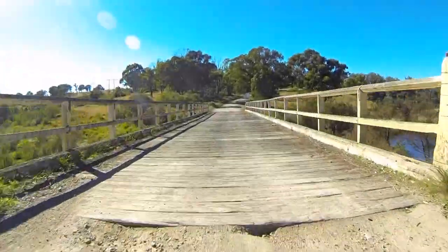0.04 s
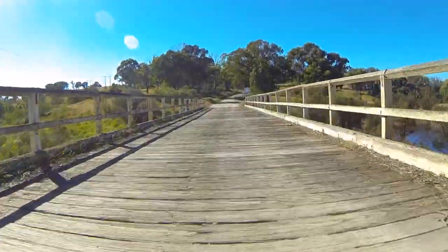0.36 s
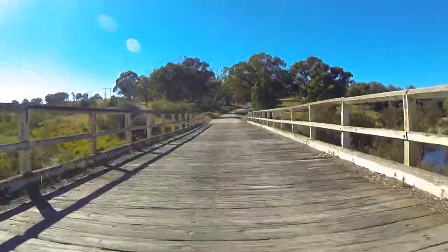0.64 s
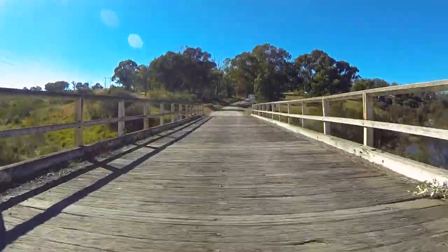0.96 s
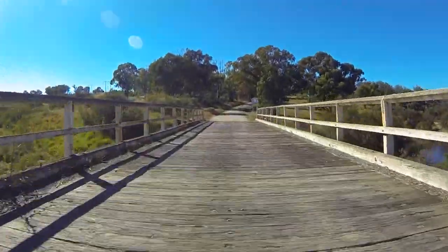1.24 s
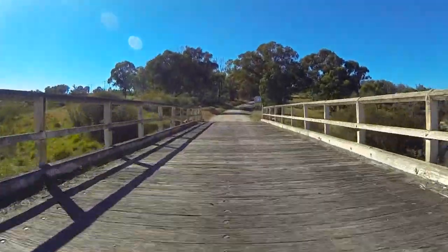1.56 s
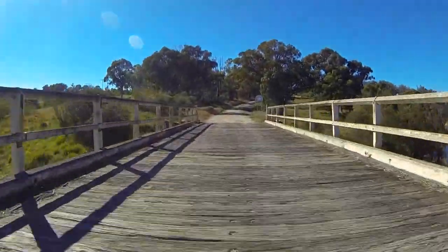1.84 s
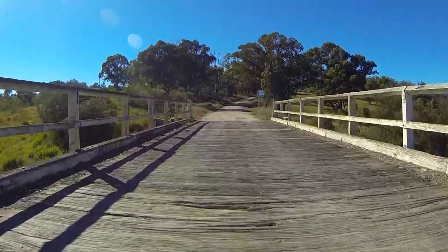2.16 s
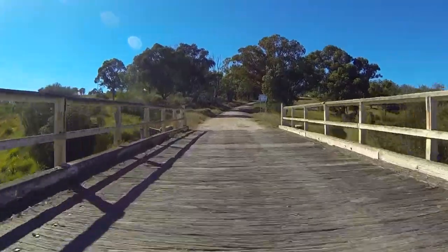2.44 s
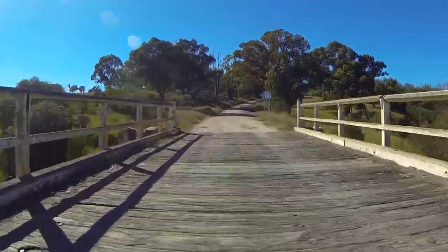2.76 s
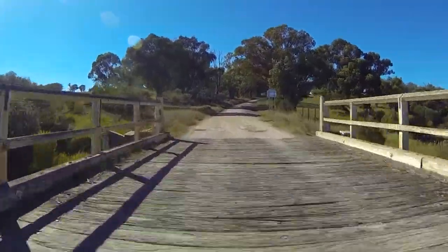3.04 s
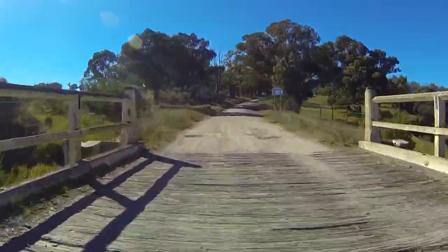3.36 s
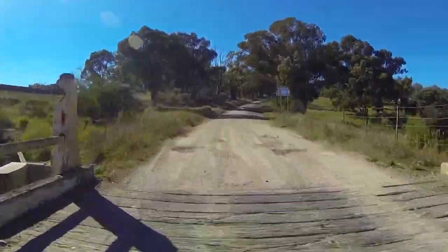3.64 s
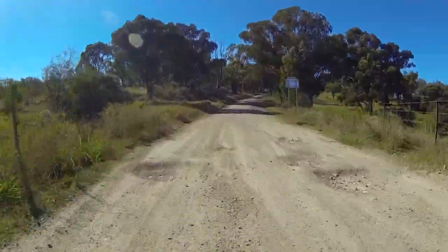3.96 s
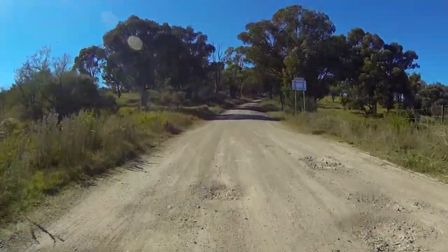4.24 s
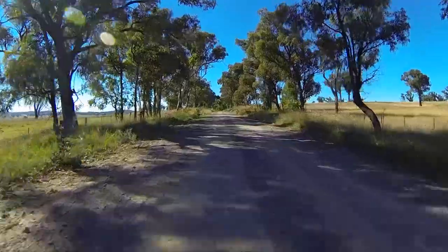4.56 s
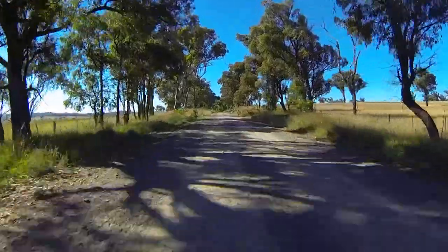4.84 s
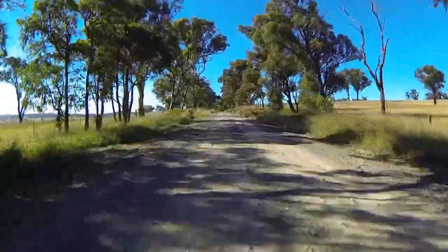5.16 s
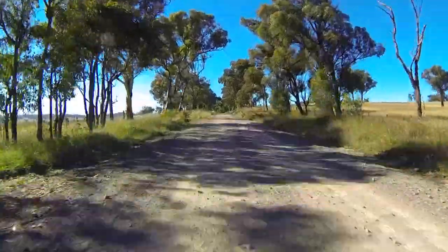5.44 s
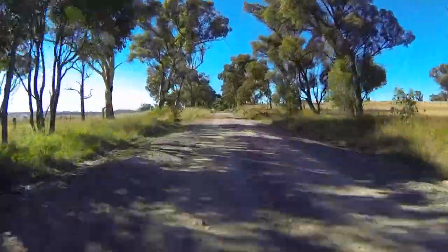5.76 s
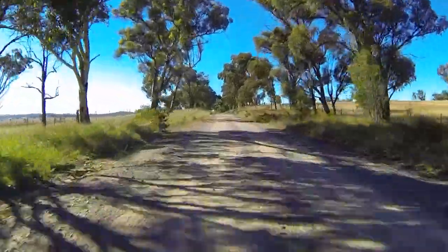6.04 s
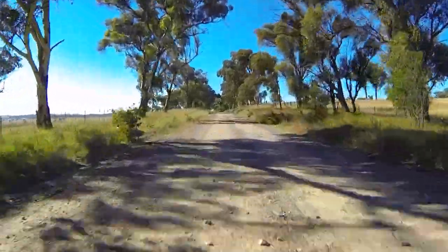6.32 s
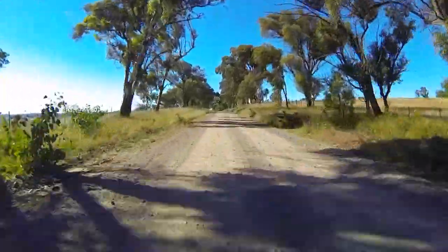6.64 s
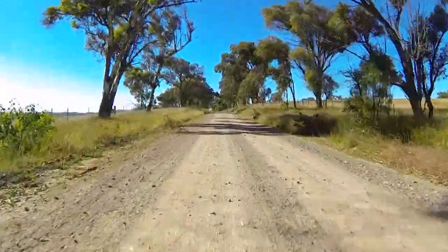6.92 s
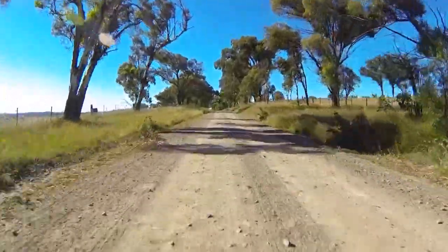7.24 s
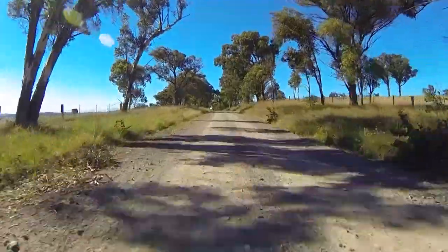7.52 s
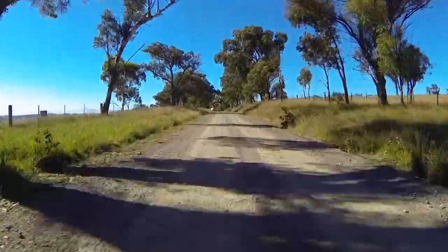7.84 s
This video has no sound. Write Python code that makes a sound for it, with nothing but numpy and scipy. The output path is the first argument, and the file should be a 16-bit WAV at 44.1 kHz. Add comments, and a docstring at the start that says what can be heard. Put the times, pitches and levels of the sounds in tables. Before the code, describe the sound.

Tyres thump across loose wooden boards as a car rattles, giving way to gravel roar, a steady engine and wind on the microphone.

```python
"""Car on a timber bridge, then gravel

Heard from the bonnet, a six-cylinder car coasts over a timber bridge: the tyres drum and knock on the planks,
and the body rattles and squeaks. At 4.5 s the scene changes to the car pulling gently along a gravel road: the
engine drones, the tyres roar, stones tick under the body and wind buffets the microphone. The sound is dull and
nearly mono, and the camera case around the microphone rings in the treble."""
import sys
import numpy as np
from scipy import signal
from scipy.io import wavfile

SR = 44100
rng = np.random.default_rng(int(sys.argv[2]) if len(sys.argv) > 2 else 0)


def digitize_waveform(pressure):
    """Quantize a signal to 16-bit integers and store it at the path in sys.argv[1].

    Rows of a 2-D input are taken as channels; values are limited to [-1, 1].
    """
    field = np.atleast_2d(pressure).T
    bounded = np.clip(field, -1, 1)
    quanta = np.round(bounded * 32767).astype(np.int16)
    wavfile.write(sys.argv[1], SR, quanta)


N = 356636
TIME = np.arange(N) / SR
GRAVEL_FROM_S = 4.48

# Levels in the tables are relative: the functions add their own gains.
# A ring_s is the time a sound takes to fade by 60 dB.

# Tone colours, or how strong each noise is from low to high: pitch_hz, level_db
HISS_COLOUR = [(3000, 1), (8000, -8), (12000, -4), (15500, -1)]
GRAVEL_COLOUR = [(20, -27), (32, -8.5), (45, -4), (75, -6), (100, -8.5), (150, -6), (240, -12.5),
                 (320, -21.5), (620, -26.8), (1000, -33.8), (1400, -38), (2000, -45.5), (4600, -58.8),
                 (8000, -80.5), (15000, -76)]
TICK_COLOUR = [(600, -12), (1500, 13), (3000, -1), (6000, -0.5), (8000, -30), (11500, -2), (15500, -37.5)]
BRIDGE_COLOUR = [(12, -42), (20, -8), (53, -1.5), (129, -3.5), (245, -5.5), (315, -15.3), (519, -21),
                 (614, -23.5), (1040, -24.5), (1200, -28.5), (2840, -40.5), (4400, -44), (6020, -49.5),
                 (8640, -76), (11100, -39), (15500, -77.5)]
CLATTER_COLOUR = [(300, 1), (600, -4), (1000, -10), (2000, -9.5), (2900, -17), (5500, -23), (8000, -49.5),
                  (11500, -38), (15500, -58)]

# Loudness along the gravel road: time_s, wind_db, drum_db, roar_db
GRAVEL_LEVELS = [(4.5, -33, -33, -46.5), (4.75, -35, -31, -43.5), (5.0, -33, -33, -44.5),
                 (5.33, -33.5, -36, -47.5), (5.93, -36, -38, -49), (6.7, -33.5, -36, -48),
                 (7.13, -34.5, -35.5, -47.7), (7.8, -31.5, -32.5, -45.7)]
# Engine speed, counted in full four-stroke cycles: time_s, speed_hz
ENGINE_SPEED = [(4.45, 17.53), (4.75, 17.64), (5, 17.92), (5.6, 18.3), (6, 18.6), (6.6, 18.87), (7, 19.03),
                (7.2, 19.06), (8.09, 19.41)]
# How hard the engine pulls: time_s, drone_db, howl_db
ENGINE_LOAD = [(4.45, -1.5, -2), (5.1, 1, 2.5), (6.3, 0, 0.5), (7.3, 0, 2), (8.09, 0, 2)]
# Tones of the engine's drone and its air intake's howl. Each is a multiple of the engine speed and
# swells where it meets a resonance: multiple, level_db, swell_speed_hz, swell_width_hz, swell_db
DRONE_TONES = [(6, -36, 18.5, .5, 2), (7, -52, 19.25, .35, 13), (8, -38, 18.6, 1.1, 5),
               (9, -42, 18.45, .85, 13), (10, -55, 18.75, .18, 13), (12, -48, 18, .5, 7),
               (14, -49, 19.1, .4, 3), (18, -50, 19.3, .35, 7), (20, -58, 19.3, .4, 11),
               (21, -60, 18.9, .7, 9), (22, -54, 18.35, .55, 10.5), (24, -58, 18.6, .6, 9),
               (28, -64, 18.95, .35, 11), (38, -66, 18.3, .3, 10), (42, -68, 18.95, .35, 10)]
HOWL_TONES = [(64, -72, 19.2, .55, 14), (66, -75, 18.75, .55, 21.5), (70, -75, 18.3, .4, 13),
              (72, -75, 18.85, .42, 18)]
# Resonances of the air intake: pitch_hz, half_width_hz, level_db
INTAKE_RESONANCES = [(1230, 50, -0.5), (1358, 32, -2.5)]

# Trim squeaking as the body flexes: start_s, level_db, pitch_hz, length_s
SQUEAK_EVENTS = [(2.611, -47.5, 4030, 0.018), (2.674, -47, 3910, 0.018), (2.913, -46.5, 3930, 0.023),
                 (2.975, -44, 3950, 0.028), (3.128, -53, 3950, .015), (3.36, -48, 4090, 0.014),
                 (3.389, -54, 4650, 0.032), (3.663, -52, 4090, 0.014), (4.338, -56, 4620, .025),
                 (5.151, -49, 3760, 0.015), (5.292, -46, 3830, 0.013), (5.43, -55, 3760, .014),
                 (6.588, -57, 4530, .02), (6.815, -57, 4580, .022), (7.571, -52, 4620, 0.012)]
# Stones and loose fittings ticking: start_s, level_db
TICK_EVENTS = [(0.592, -43), (0.751, -49), (2.106, -42), (2.498, -50), (2.9442, -52), (3.0075, -48),
               (3.307, -52), (3.4444, -48), (3.511, -53), (4.3125, -48.5), (4.466, -50.5), (4.7154, -44),
               (4.915, -49), (5.0005, -44), (5.547, -48), (5.604, -50), (5.643, -47), (6.2981, -50),
               (7.11, -53), (7.7894, -51)]
# Bouts of buzzing from a small loose metal part: loudest_s, level_db, build_up_s
BUZZ_EVENTS = [(0.58, -67, 0.097), (1.207, -57, 0.013), (1.32, -55.5, 0.097), (1.37, -54, .018),
               (1.59, -57, .06), (1.67, -62, .02), (1.895, -64, .008)]
# The notes that metal part rings at: pitch_hz, level_db
METAL_NOTES = [(9450, -1), (10820, 0), (11100, 4), (12020, 3), (12520, -8), (13050, -6), (14950, -5)]

# How hard the bridge shakes the car: time_s, drum_db, roar_db
BRIDGE_LEVELS = [(0.0, -34, -45), (0.27, -35, -49), (0.42, -31.5, -45.5), (0.7, -33.5, -43.5),
                 (0.87, -39.5, -46), (1.19, -36.5, -45.5), (1.3, -31, -36.5), (1.41, -32.5, -44),
                 (1.6, -37.5, -44), (1.82, -44, -50), (1.94, -33, -46), (2.13, -32.5, -45.5),
                 (2.24, -37, -48), (2.72, -41, -56.5), (3.05, -36.5, -47.5), (3.3, -42, -54),
                 (3.74, -37.5, -51), (4.3, -40, -55), (4.48, -33.5, -50)]
# The body's rumble compared with the drumming: time_s, offset_db
BODY_RUMBLE = [(0.2, -5), (0.7, -2), (1.3, .5), (3, 1), (4.4, 0)]
# Hollow notes of loose timbers: start_s, level_db, pitch_hz, ring_s
TIMBER_EVENTS = [(0.564, -31, 610, .08), (0.682, -29, 640, 0.077), (0.863, -32, 570, .09),
                 (0.884, -22.5, 537, .11), (1.083, -25.5, 550, .07), (1.108, -27.5, 420, .07),
                 (2.04, -27.5, 485, 0.17)]
# A loose plank slapping the beam under it: start_s, level_db
SLAP_EVENTS = [(1.362, -26), (1.4667, -25)]
# The notes that plank rings at: pitch_hz, level_db, ring_s
PLANK_NOTES = [(644, -5.5, .08), (914, 4, 0.049), (1260, -4, .06), (1464, -2.5, 0.041), (2094, -12, 0.058),
               (2902, -13, .06)]
# Blows from planks, ruts and stones: start_s, knock_db, thump_db, clatter_db, pitch_hz
KNOCK_EVENTS = [(0.073, -31, -36, -54, 650), (0.143, -32, -38, -56, 1000), (0.217, -31, -32, -57, 550),
                (0.272, -27.5, -37, -51, 900), (0.372, -30, -22, -58, 400), (0.453, -25, -28, -43, 700),
                (0.524, -31, -20.5, -49, 500), (0.565, -22.5, -31, -41, 800), (0.606, -25, -21, -47, 700),
                (0.683, -24, -25, -49, 620), (0.73, -29, -36, -50, 700), (0.815, -31, -42, -47, 900),
                (1.083, -26, -38, -47, 560), (1.206, -19, -26, -36, 850), (1.232, -24, -32, -31.5, 2900),
                (1.284, -21, -25, -36, 1400), (1.31, -21, -25, -35, 1000), (1.362, -17, -25, -34, 1000),
                (1.428, -24, -34, -42.5, 1000), (1.467, -17, -40, -40, 1400), (1.585, -30, -27, -47, 1000),
                (1.663, -30, -36, -41, 900), (1.894, -33, -31, -48, 700), (1.975, -24.5, -29, -44, 700),
                (2.040, -20.5, -22, -39, 700), (2.105, -26, -32, -42, 1300), (2.158, -28, -27, -46, 1300),
                (2.293, -26, -31, -49, 690), (2.403, -25.5, -37, -46, 900), (2.424, -30, -40, -48, 1400),
                (2.807, -27.5, -35, -47, 1100), (2.835, -31, -34, -50, 1200), (2.976, -29, -35, -54, 1000),
                (3.11, -30, -38, -56, 1100), (3.425, -28, -31, -49, 900), (3.56, -34, -38, -50, 1500),
                (3.661, -27.5, -37, -56, 700), (3.72, -32, -30, -54, 800), (3.812, -32, -32, -52, 1000),
                (4.140, -28.5, -36, -47, 890), (4.40, -36, -28, -56, 600), (4.51, -33, -24, -55, 500),
                (4.533, -25, -36, -49, 700), (4.583, -26, -37, -47, 1600), (4.661, -26, -32, -48, 900),
                (4.685, -23, -26, -46, 1100), (4.784, -22, -26, -45, 1000), (5.05, -27, -30, -48, 1900),
                (7.664, -26, -32, -53, 1500), (7.745, -27, -26, -52, 1200)]
# The low notes of the suspension and bonnet: pitch_hz, level_db, ring_s
BODY_NOTES = [(59.7, -3, 0.4), (76.6, 4, 0.05), (122.6, 2, 0.16), (145.7, -1.5, 0.22), (187, -.5, 0.07),
              (255, -1.5, 0.17)]

# A slight lean to the left, added to that side and taken from the right: time_s, lean_db
LEFT_LEAN = [(4.5, 0), (5.2, 0.3), (6.7, 0.25), (7.2, 0)]
# Resonances of the camera case: pitch_hz, width_hz, boost_db
CASE_RESONANCES = [(2790, 160, 2.5), (3950, 300, 3), (5900, 500, 3), (7950, 400, 3), (9450, 450, 5),
                   (10900, 600, 4), (12500, 200, 3)]


def from_db(db):
    """Turn decibels into a number to multiply by."""
    return 10 ** (np.asarray(db) / 20)


def unit_level(sound):
    """Scale a sound so that its average level (rms) is 1."""
    return sound / np.sqrt(np.mean(sound ** 2) + 1e-20)


def curves(rows):
    """Join a table's points in time, giving one curve for each column after the first."""
    times, *columns = np.transpose(rows)
    return [np.interp(TIME, times, column) for column in columns]


def follow(db, offset_db, share):
    """A level curve set apart from another, copying a share of its ups and downs."""
    return db.mean() + offset_db + share * (db - db.mean())


def white_noise():
    """Noise with all pitches equally strong."""
    return rng.standard_normal(N)


def drift(rate_hz):
    """A smooth random wander, about 1 in size; a higher rate wanders faster."""
    step, warm_up = 40, 2000
    keep = np.exp(-2 * np.pi * step * rate_hz / SR)
    noise = rng.standard_normal(N // step + warm_up + 2)
    slow = signal.lfilter([1], [1, -2 * keep, keep * keep], noise)[warm_up:]
    return np.interp(np.arange(N) / step, np.arange(len(slow)), unit_level(slow))


def clicks_at(times, heights):
    """Silence with one click at each time."""
    clicks = np.zeros(N)
    samples = np.round(np.asarray(times) * SR).astype(int)
    np.add.at(clicks, np.clip(samples, 0, N - 1), heights)
    return clicks


def ring(clicks, hz, ring_s):
    """Each click starts a pure note that fades away."""
    keep = from_db(-60 / (ring_s * SR))
    turn = 2 * np.pi * hz / SR
    return signal.lfilter([0, np.sin(turn)], [1, -2 * keep * np.cos(turn), keep * keep], clicks + 1e-18)


def fade_after(clicks, ring_s):
    """A loudness curve that jumps at each click, then dies away."""
    keep = from_db(-120 / (ring_s * SR))
    return np.sqrt(signal.lfilter([1], [1, -keep], clicks ** 2 + 1e-18))


def jolts(per_s, spread_db, ring_s, share):
    """A bumpy loudness curve: small random hits give a share of the power, the rest is steady."""
    hits = rng.random(N) < per_s / SR
    heights = from_db(spread_db * np.clip(white_noise(), -2, 2))
    bumps = unit_level(fade_after(hits * heights, ring_s))
    return np.sqrt(1 - share + share * bumps ** 2)


def band(sound, low_hz, high_hz):
    """Keep the part of a sound between two pitches."""
    return signal.sosfilt(signal.butter(2, [low_hz, high_hz], "band", fs=SR, output="sos"), sound)


def resonate(sound, hz, width_hz, boost_db):
    """Make a sound louder around one pitch, or quieter if the boost is negative."""
    near_pitch = signal.lfilter(*signal.iirpeak(hz, hz / width_hz, fs=SR), sound)
    return sound + (from_db(boost_db) - 1) * near_pitch


def colour_gain(colour, hz):
    """How strong a tone colour is at a given pitch."""
    pitches, levels = np.transpose(colour)
    return from_db(np.interp(np.log(hz), np.log(pitches), levels))


def colour_level(colour, low_hz, high_hz):
    """The average level between two pitches of white noise given this colour."""
    return np.sqrt(np.sum(colour_gain(colour, np.arange(low_hz, high_hz)) ** 2) * 2 / SR)


def coloured(colour, noise_for):
    """Build a tone colour from half-octave bands; noise_for(hz) feeds each band."""
    edges = 22 * 2 ** np.arange(0, 9.6, .5)
    out = 0
    for low, high in zip(edges, edges[1:]):
        hz = np.sqrt(low * high)
        out = out + colour_gain(colour, hz) * band(noise_for(hz), low, high)
    return out


def microphone_hiss():
    """The microphone's own faint, steady hiss."""
    return from_db(-78) * unit_level(coloured(HISS_COLOUR, lambda hz: white_noise()))


def rolling(colour, zones, shake, grit, wander_db):
    """Tyre noise, shaken by jolts and gritty on top. Each zone is low_hz, high_hz, level_db."""
    centres = [np.log(np.sqrt(low * high)) for low, high, db in zones]
    gains = [from_db(db) / colour_level(colour, low, high) for low, high, db in zones]

    def noise_for(hz):
        weights = [np.interp(np.log(hz), centres, row) for row in np.eye(len(zones))]
        level = sum(gain * weight for gain, weight in zip(gains, weights))
        shaken = 1 + min(hz / 500, 1) * (shake - 1)
        gritty = 1 + min(hz / 4000, 1) * (grit - 1)
        return white_noise() * level * shaken * gritty * from_db(wander_db * drift(15.2))
    return coloured(colour, noise_for)


def wind_and_gravel():
    """Wind buffets the microphone while the tyres crunch over small stones."""
    wind_db, drum_db, roar_db = curves(GRAVEL_LEVELS)
    crunch_db = follow(roar_db, offset_db=-12.5, share=0.85)
    zones = [(30, 100, wind_db), (110, 280, drum_db), (550, 1100, roar_db), (1800, 7000, crunch_db)]
    ruts = jolts(per_s=260, spread_db=-1, ring_s=0.035, share=0.19)
    stones = jolts(per_s=850, spread_db=7, ring_s=0.0048, share=0.33)
    return from_db(-0.1) * rolling(GRAVEL_COLOUR, zones, ruts, stones, wander_db=1.62)


def engine(wobble=0.0006, flutter_db=1, uneven_db=.7, rush_db=-59, throb_at_s=6.011):
    """Six cylinders fire each cycle; being unequal, they add more tones. Gears whine, the intake howls."""
    speed_hz, = curves(ENGINE_SPEED)
    drone_db, howl_db = curves(ENGINE_LOAD)
    angle = 2 * np.pi * np.cumsum(speed_hz * (1 + wobble * drift(7))) / SR
    angle -= np.interp(throb_at_s, TIME, angle)
    drone_db += uneven_db * drift(14)   # no two cycles fire equally hard

    def tone(multiple, db):
        # low tones line up into one throb a cycle; the body scatters the higher ones
        scatter = min(multiple / 20, 1) ** 2
        phase = scatter * rng.uniform(-np.pi, np.pi)
        level = from_db(db + flutter_db * np.sqrt(scatter) * drift(13))
        return np.sqrt(2) * level * np.sin(multiple * angle + phase)

    # the gears whine as the drive takes up, then fade from 5.2 s on
    whine_db = -45.5 - 40.5 * np.maximum(TIME - 5.2, 0)
    out = tone(multiple=26.55, db=whine_db)
    for tones, load_db in ((DRONE_TONES, drone_db), (HOWL_TONES, howl_db)):
        for multiple, db, swell_speed_hz, width_hz, swell_db in tones:
            nearness = np.exp(-((speed_hz - swell_speed_hz) / width_hz) ** 2)
            out += tone(multiple, db + load_db + swell_db * nearness)
    # air rushing in rings the intake too
    rush = sum(from_db(db) * band(white_noise(), hz - half_width, hz + half_width)
               for hz, half_width, db in INTAKE_RESONANCES)
    return out + from_db(rush_db + howl_db) * unit_level(rush)


def trim_squeaks(gain_db=-2.5, arch=0.025, waver=0.014, scratch_db=2.5):
    """Trim sticks and slips, making short tones that rise and fall in pitch."""
    out = np.zeros(N)
    unsteady = waver * drift(300)
    grip = from_db(scratch_db * drift(300))
    for start_s, db, hz, length_s in SQUEAK_EVENTS:
        span = (TIME > start_s - .002) & (TIME < start_s + length_s)
        swell = np.sin(np.pi * np.linspace(0, 1, span.sum()) ** 0.57).clip(0)
        looseness = from_db(.6 * (-45 - db))   # fainter squeaks hold their pitch less well
        pitch_hz = hz * (1 + arch * (swell - .5) + unsteady[span] * looseness)
        tone = np.sin(2 * np.pi * np.cumsum(pitch_hz) / SR)
        out[span] += from_db(db + gain_db) * swell * grip[span] * tone
    return out


def ticks(gain_db=-3.5, ring_s=0.045, variety_db=2, top_hz=12300):
    """Stones and loose fittings hit the body and chatter briefly, each with its own colour."""
    start_s, level_db = np.transpose(TICK_EVENTS)
    chatter = jolts(per_s=430, spread_db=1, ring_s=0.0072, share=0.13)

    def noise_for(hz):
        heights = from_db(level_db + gain_db - variety_db * rng.standard_normal(len(start_s)))
        return white_noise() * chatter * fade_after(clicks_at(start_s, heights), ring_s) * (hz > 500)
    ticking = coloured(TICK_COLOUR, noise_for) / colour_level(TICK_COLOUR, 3000, 12000)
    return signal.sosfilt(signal.butter(6, top_hz, fs=SR, output="sos"), ticking)


def metal_buzz(gain_db=-3, ring_s=.02, fizz_db=-6, rise_db=22.5, fade_stretch=1.2):
    """A small loose metal part buzzes against its seat in bouts that build up and die away."""
    bouts = 0
    for loudest_s, db, build_up_s in BUZZ_EVENTS:
        distance = np.maximum(loudest_s - TIME, (TIME - loudest_s) / fade_stretch).clip(0, 1)
        bouts = bouts + from_db(db - rise_db * distance / build_up_s)
    contacts = white_noise() * jolts(per_s=410, spread_db=12, ring_s=0.0033, share=0.54)
    ringing = unit_level(sum(ring(contacts * from_db(db), hz, ring_s) for hz, db in METAL_NOTES))
    fizz = unit_level(band(band(contacts, 10300, 13500), 10300, 13500))
    return from_db(gain_db) * bouts * (ringing + from_db(fizz_db) * fizz)


def bridge_drumming():
    """The tyres drum over the planks, loose fittings rattle and the bonnet booms."""
    drum_db, roar_db = curves(BRIDGE_LEVELS)
    rumble_db = drum_db + curves(BODY_RUMBLE)[0]
    rattle_db = follow(roar_db, offset_db=-12.3, share=1.05)
    zones = [(40, 100, rumble_db), (110, 280, drum_db), (500, 2500, roar_db), (1800, 7000, rattle_db)]
    planks = jolts(per_s=110, spread_db=2.5, ring_s=0.05, share=0.45)
    grit = jolts(per_s=150, spread_db=3.5, ring_s=0.018, share=0.25)
    out = from_db(-.5) * rolling(BRIDGE_COLOUR, zones, planks, grit, wander_db=1.98)
    out = resonate(out, hz=526, width_hz=106, boost_db=3)
    out = resonate(out, hz=59.6, width_hz=23, boost_db=3)
    return resonate(out, hz=140, width_hz=34, boost_db=4.5)


def hollow_timbers(rise_s=0.0022):
    """A tyre presses a loose timber rather than striking it, so its hollow note swells, then dies."""
    out = np.zeros(N)
    for start_s, db, hz, ring_s in TIMBER_EVENTS:
        swell = 1 - np.exp(-np.clip(TIME - start_s, 0, .1) / rise_s)
        out += swell * ring(clicks_at([start_s], from_db(db)), hz, ring_s)
    return out


def plank_slaps(crack_db=-1.5, contact_count=3, bounce_s=.0068, bounce_loss_db=4):
    """A plank cracks against its beam and bounces; each contact sets it ringing again."""
    contacts = [(start_s + bounce_s * bounce * rng.uniform(.85, 1.15), db - bounce_loss_db * bounce)
                for start_s, db in SLAP_EVENTS for bounce in range(contact_count)]
    times, level_db = np.transpose(contacts)
    crack_noise = band(band(white_noise(), 500, 4200), 500, 4200)
    out = from_db(crack_db) * crack_noise * fade_after(clicks_at(times, from_db(level_db)), ring_s=.016)
    for hz, note_db, ring_s in PLANK_NOTES:
        signs = rng.choice([-1, 1], len(times))
        out += ring(clicks_at(times, signs * from_db(level_db + note_db - 3)), hz, ring_s)
    return out


def cushioned_blows(times, level_db, ring_s, rise_s=0.0015):
    """A loudness curve of fading blows, each with its start softened by the tyre."""
    sharp = fade_after(clicks_at(times, from_db(level_db)), ring_s)
    keep = np.exp(-1 / (rise_s * SR))
    return signal.lfilter([1 - keep], [1, -keep], sharp)


def tyre_knocks(knock_gain_db=-10.7, clatter_gain_db=-5.2, thump_gain_db=-2, hollow_db=4):
    """Each blow thumps the body, rings around its own pitch and makes loose parts clatter."""
    start_s, knock_db, thump_db, clatter_db, pitch_hz = np.transpose(KNOCK_EVENTS)
    clatter = cushioned_blows(start_s, clatter_db + clatter_gain_db, ring_s=.14)
    clatter /= colour_level(CLATTER_COLOUR, 1800, 7000)
    wood_level = colour_level(CLATTER_COLOUR, 300, 3000)
    contacts = jolts(per_s=500, spread_db=1.5, ring_s=0.0074, share=0.32)

    def noise_for(hz):
        if hz < 250:
            return np.zeros(N)
        octaves_away = np.log2(hz / pitch_hz)
        ringing_db = hollow_db * np.exp(-(octaves_away / 0.51) ** 2)
        wood = cushioned_blows(start_s, knock_db + knock_gain_db + ringing_db, ring_s=.115) / wood_level
        clatter_share = np.clip(hz / 1500 - .7, 0, 1)   # wood below, clatter above
        return white_noise() * contacts * (wood + clatter_share * (clatter - wood))
    out = coloured(CLATTER_COLOUR, noise_for)
    out = resonate(out, hz=2850, width_hz=480, boost_db=2)   # the loose parts ring here
    out = resonate(out, hz=1880, width_hz=230, boost_db=-3)
    # every blow lands elsewhere, so each body note gets its own strength and direction
    chance_db, directions = rng.standard_normal((2, len(BODY_NOTES), len(start_s)))
    for (hz, db, ring_s), extra_db, signs in zip(BODY_NOTES, chance_db, np.sign(directions)):
        heights = signs * from_db(thump_db + thump_gain_db + db + extra_db)
        out += ring(clicks_at(start_s, heights), hz, ring_s)
    return out


def scene():
    """Bridge, then gravel road; left and right hear almost the same."""
    on_road = np.clip((TIME - GRAVEL_FROM_S) / 0.055 + .5, 0, 1)
    car = np.sqrt(1 - on_road) * bridge_drumming()
    car += np.sqrt(on_road) * (wind_and_gravel() + engine())
    car += tyre_knocks() + plank_slaps() + hollow_timbers()
    car += ticks() + trim_squeaks() + metal_buzz()
    car += microphone_hiss()
    lean_db, = curves(LEFT_LEAN)
    return car * from_db([lean_db, -lean_db])


def record(dry):
    """The camera case rings in the treble; the deepest bass and the very top are cut, the ends faded."""
    bottom_hz, top_hz, fade_s = 32, 15750, .003
    out = signal.sosfilt(signal.butter(4, bottom_hz, "high", fs=SR, output="sos"), dry)
    for hz, width_hz, boost_db in CASE_RESONANCES:
        out = resonate(out, hz, width_hz, boost_db)
    out *= np.clip(np.minimum(TIME, TIME[-1] - TIME) / fade_s, 0, 1)
    return signal.sosfilt(signal.ellip(12, .1, 80, top_hz, fs=SR, output="sos"), out)


dry = scene()
out = record(dry)
digitize_waveform(out)
```